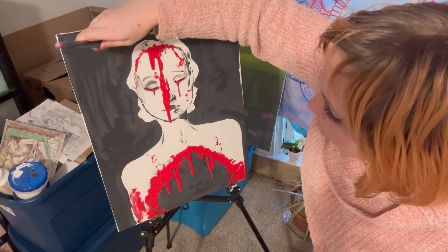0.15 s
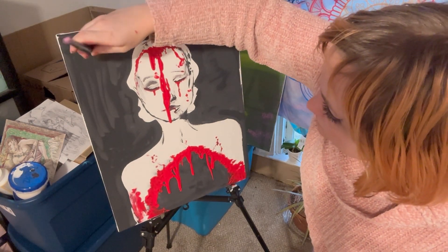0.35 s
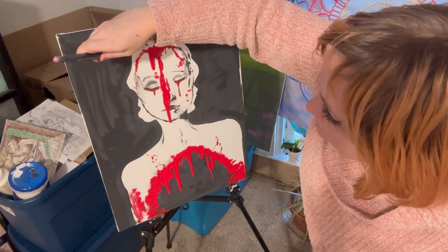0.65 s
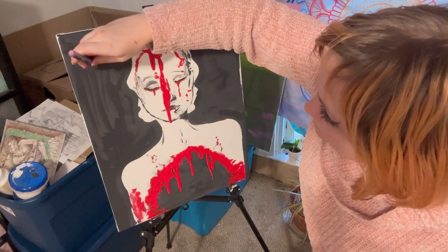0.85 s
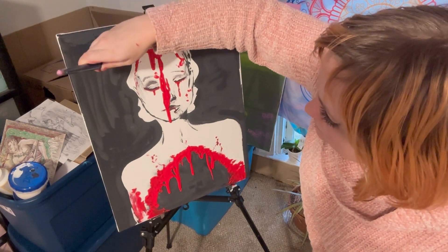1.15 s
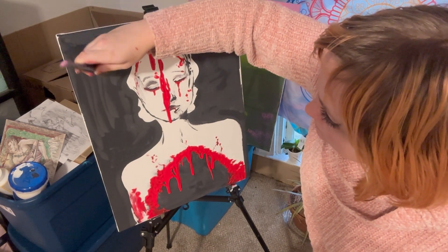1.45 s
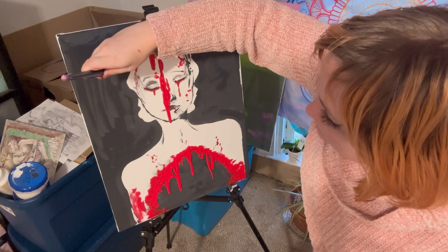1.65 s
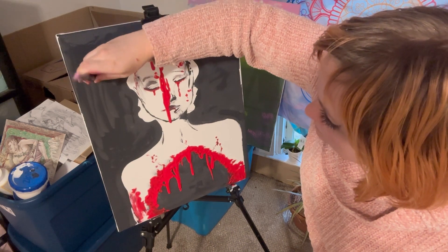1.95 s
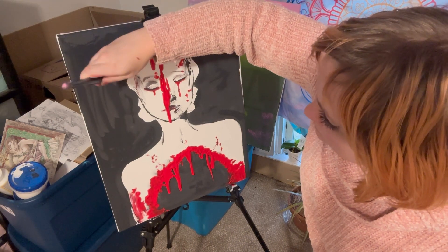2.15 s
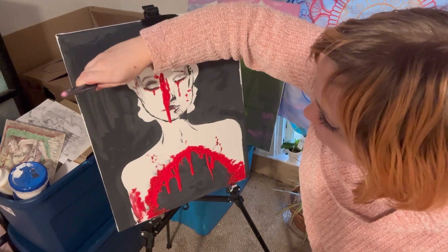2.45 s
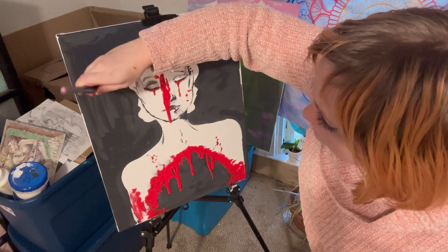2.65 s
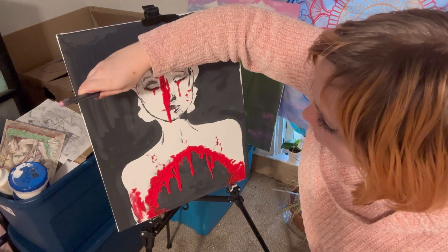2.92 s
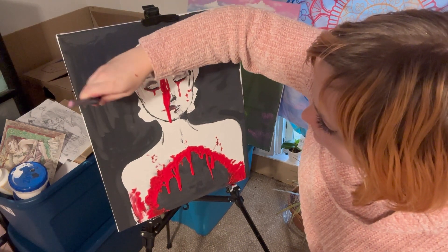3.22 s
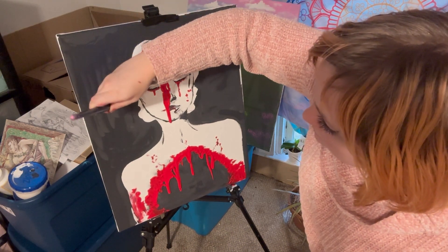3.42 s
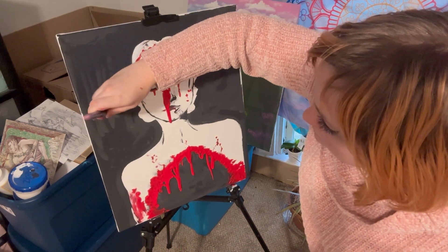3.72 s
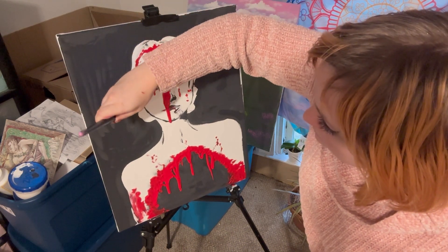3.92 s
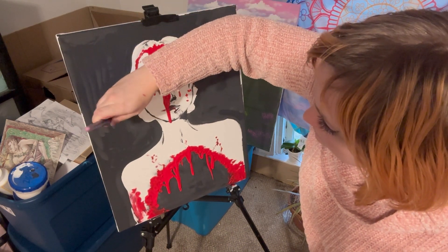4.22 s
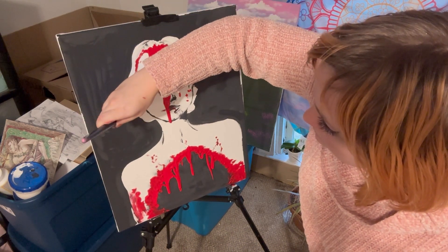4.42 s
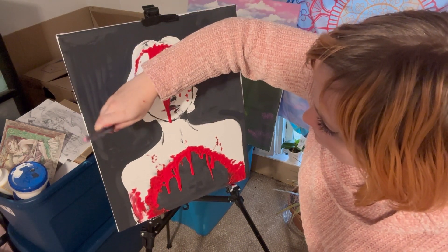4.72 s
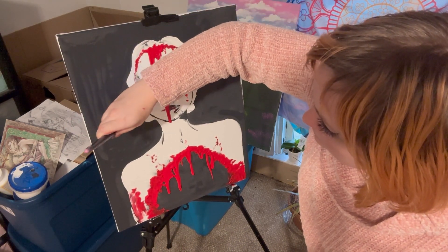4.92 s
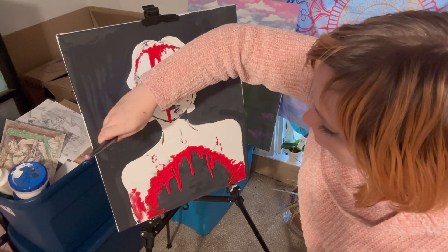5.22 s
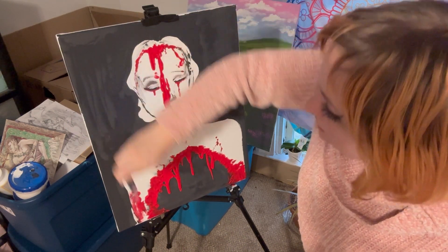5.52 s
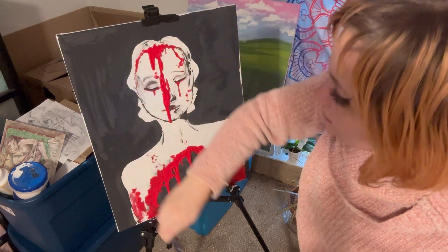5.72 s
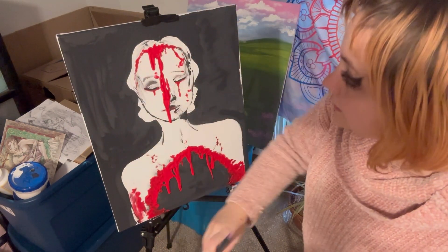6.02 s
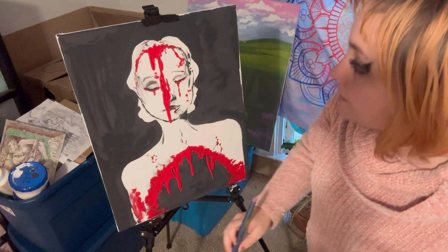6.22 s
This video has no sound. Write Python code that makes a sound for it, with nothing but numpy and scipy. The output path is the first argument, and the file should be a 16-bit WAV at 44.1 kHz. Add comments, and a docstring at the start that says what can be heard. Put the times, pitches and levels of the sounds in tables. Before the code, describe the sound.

A paintbrush makes eleven short, hissing, scraping strokes on a taut canvas in a small room, over low hum and a distant engine drone.

```python
"""In a small room, over mains hum and a distant engine that pulls, a paintbrush starts across a canvas.
Eleven short strokes follow: slips of the bristles hiss and scrape on the weave and the canvas answers.
The engine eases off early and runs on, sinking to a throbbing idle; between strokes the brush ticks,
squeaks and drags, and hand and sleeve rub. At last the arm drops: the sleeve rustles, the hand bumps softly.
Friction is coloured noise shaped by the speed of the hand; engine, hum, squeaks and bumps are sines."""
import sys
import numpy as np
from scipy import signal
from scipy.fft import rfft, irfft, next_fast_len
from scipy.io import wavfile

SR = 44100
rng = np.random.default_rng(int(sys.argv[2]) if len(sys.argv) > 2 else 0)


def materialize(psi):
    """Save the field psi as 16-bit PCM at rate SR to the path in sys.argv[1].

    A 1-D psi becomes a single channel; in a 2-D psi each row is a channel.
    """
    bounded = np.clip(np.atleast_2d(psi).T, -1, 1)
    quanta = np.round(bounded * 32767).astype(np.int16)
    wavfile.write(sys.argv[1], SR, quanta)


N = 280917
TIME = np.arange(N) / SR

# Brush strokes. Each row: time of full speed in seconds, rise in seconds, fall in seconds,
# tips in dB, scrape in dB, canvas in dB, drum in dB, rasp in Hz, rasp in dB, sibilance in Hz,
# sibilance in dB (the tips before their common lift).
STROKES = [(0.233, 0.051, 0.051, -70.5, -67.5, -70, -65.5, 5100, -67.5, 7400, -71),
           (0.779, 0.048, 0.05, -74.5, -69, -79.5, -72.5, 2140, -79.5, 7400, -79.5),
           (1.336, 0.05, 0.041, -72, -69.5, -75.5, -70, 4100, -84, 7400, -76),
           (1.93, 0.056, 0.036, -71.5, -69.5, -73, -78, 2150, -80, 7800, -74.5),
           (2.486, 0.052, 0.06, -73, -68.5, -75.5, -88, 4430, -81, 7700, -75.5),
           (3.062, 0.087, 0.04, -74, -70.5, -77, -72, 1710, -77, 7800, -78),
           (3.6, 0.033, 0.063, -72, -69, -73.5, -74, 4400, -79, 7950, -77),
           (4.066, 0.039, 0.058, -71, -70, -74, -75, 4370, -75, 6750, -81),
           (4.55, 0.057, 0.047, -74, -72.5, -80, -76.5, 4400, -82, 6600, -80),
           (4.97, 0.05, 0.051, -75, -73, -80, -74, 4000, -79, 6100, -81),
           (5.328, 0.037, 0.048, -75, -71.5, -79.5, -75, 2080, -86, 7860, -76)]


def from_db(db):
    """Decibels to gain."""
    return 10 ** (np.asarray(db) / 20)


def rms_one(x):
    """Scale to unit rms."""
    return x / np.sqrt(np.mean(x ** 2) + 1e-20)


def in_time(rows):
    """One curve per column after the time, with a value for every sample."""
    s, *columns = np.transpose(rows)
    return [np.interp(TIME, s, column) for column in columns]


def coloured(x, spectrum):
    """Give a steady excitation a spectrum that dies away above its last point; rms 1."""
    hz, db = np.transpose([*spectrum, (SR / 2, -100)])
    size = next_fast_len(N)
    bins_hz = np.maximum(np.fft.rfftfreq(size, 1 / SR), 1)
    gain = from_db(np.interp(np.log(bins_hz), np.log(hz), db))
    return rms_one(irfft(rfft(x, size) * gain, size)[..., :N])


def drift(rate):
    """Smooth random wandering with spread 1, through a new value `rate` times a second."""
    knots = rng.standard_normal(2048)
    return rms_one(np.interp(TIME * rate, np.arange(len(knots)), knots))


def grains(per_s, spread_db):
    """Random tiny slips of uneven size."""
    chance = rng.random(N) * SR / per_s
    slips = np.flatnonzero(chance < 1)
    out = np.zeros(N)
    size_db = spread_db * np.minimum(-np.log(chance[slips] + 1e-12), 4)
    out[slips] = from_db(size_db)
    return out * rng.uniform(-1.11, 1, N)


def resonant(hz, width_share, slips_per_s=14000):
    """Dense slips through one resonance with steep skirts; rms 1."""
    edges = hz * (1 + width_share) ** np.array([-.5, .5])
    edges = np.minimum(edges, SR / 2 - 1)
    band = signal.butter(1, edges, "band", fs=SR, output="sos")
    return rms_one(signal.sosfilt(np.vstack([band, band]), grains(slips_per_s, 1.6)))


def diffuse(spectrum, side_db):
    """Noise that arrives at the microphones from all around."""
    mid, side = coloured(rng.standard_normal((2, N)), spectrum)
    return mid + from_db(side_db) * side * [[1], [-1]]


def panned(x, right_db):
    """Make the right channel louder than the left."""
    return x * from_db([[-right_db / 2], [right_db / 2]])


def swell(s, rise, fall, onset_shape=1.86, end_shape=2.3):
    """Speed of a sweep of the hand: it gathers gradually and lifts off more quickly."""
    out = np.zeros(N)
    near = np.abs(TIME - s) < 5 * max(rise, fall)
    age = TIME[near] - s
    before = np.abs(age / rise) ** onset_shape
    after = np.abs(age / fall) ** end_shape
    out[near] = np.exp(-np.where(age < 0, before, after))
    return out


def tone(hz):
    """A sine of rms 1 that follows a pitch curve from a random phase."""
    cycles = np.cumsum(hz * np.ones(N)) / SR
    return np.sqrt(2) * np.sin(2 * np.pi * (cycles + rng.random()))


def brush(skim_db=-19, skim_s=0.095, rasp_width=0.38, rasp_lag_s=0.0043, rasp_s=0.033,
          sibilance_width=0.16, tips_lift_db=1.54):
    """Bristles skim, sizzle and scrape, ring at two pitches set by the grip, and the canvas answers."""
    # Spectra of bristle tips, bent bristles, canvas and its drumming.
    # Each row: frequency in Hz, relative level in dB.
    tips, scrape = [(3000, -28), (5500, -19), (6800, 0.5), (7800, 2), (9000, 1.5), (10000, -5),
                    (11000, -22), (14500, -14), (16000, -34)], [(500, -4), (1500, -14), (3000, -3.5), (4100, 1), (5400, -1), (6500, -1.5),
                                  (8000, -22.5), (11000, -23)]
    canvas, drumming = [(300, -9.5), (520, -5), (700, -8.5), (950, -1.5), (1200, -3.5), (1700, -4.5),
                        (2300, -5.5), (3200, -10), (7000, -40)], [(150, -8.5), (330, 5), (520, -0.5), (700, -25.5), (1500, -46)]
    # The bristles trail lightly between strokes. Each row: time in seconds, half length in seconds, level in dB.
    trailing = [(0.1, 0.017, -91), (0.676, 0.07, -88), (1.25, 0.043, -88), (1.635, 0.057, -86),
                (1.837, 0.03, -84.5), (2.26, .04, -86.5), (2.94, 0.037, -83)]
    # Pressure changes within a stroke. Each row: time in seconds, half length in seconds, change in dB.
    presses = [(2.998, 0.016, 1.5), (3.037, .012, -2), (3.649, .01, 3), (4.095, 0.0092, -2),
               (4.116, 0.0085, 4.5), (5.015, .01, 0.5)]
    tips_db, scrape_db, canvas_db, drum_db = np.transpose(STROKES)[3:7]
    sizzle = friction(tips, tips_db + tips_lift_db, lag_s=0.00034, slips_per_s=22000, grain_db=4.0,
                      flutter_db=1.5, spread_db=-22.0, steepness=1.42)
    rub = friction(scrape, scrape_db, lag_s=0.0011, slips_per_s=16000, grain_db=3.0,
                   flutter_db=0.74, spread_db=0.5, steepness=0.96)
    body = friction(canvas, canvas_db, lag_s=0.0013, slips_per_s=4000, grain_db=3.0,
                    flutter_db=3.0, spread_db=-3.0, steepness=1.0)
    drum = friction(drumming, drum_db, lag_s=-0.003, slips_per_s=3000, grain_db=1.5,
                    flutter_db=3.0, spread_db=1.0, steepness=0.82)
    skim, rasp, sibilance = np.zeros((3, N))
    for s, rise, fall, stroke_tips_db, _, _, _, rasp_hz, rasp_db, sibilance_hz, sibilance_db in STROKES:
        # a light touch leads into each stroke
        skim += from_db(stroke_tips_db + skim_db) * swell(s - rise, skim_s, rise)
        rasp += from_db(rasp_db) * swell(s + rasp_lag_s, rasp_s, fall) * resonant(rasp_hz, rasp_width)
        hiss = resonant(sibilance_hz, sibilance_width)
        sibilance += from_db(sibilance_db) * swell(s, rise, fall) * hiss
    skim *= coloured(grains(5100, 3.4), scrape)
    trails = sum(from_db(db) * swell(s, half, half) for s, half, db in trailing)
    trails = trails * coloured(grains(1200, 2.3), canvas)
    pressure = from_db(sum(db * swell(s, half, half) for s, half, db in presses))
    to_the_right = panned(rub + body + drum + skim + rasp + trails, right_db=2.0)
    return pressure * (sizzle + sibilance + to_the_right)


def friction(spectrum, levels_db, lag_s, slips_per_s, grain_db, flutter_db, spread_db, steepness):
    """Dense slips of bristles over the weave, growing with a power of the stroke's speed."""
    force = np.zeros(N)
    for (s, rise, fall, *_), db in zip(STROKES, levels_db):
        force += from_db(db) * swell(s + lag_s, rise, fall) ** steepness
    slips = coloured(grains(slips_per_s, grain_db), spectrum)
    # each microphone gets a share of its own: the same slips shifted far in time
    apart = np.array([np.roll(slips, N // 3), np.roll(slips, -N // 3)])
    texture = rms_one(slips + from_db(spread_db) * apart)
    return force * from_db(flutter_db * drift(70)) * texture


def near_hand(x, path_s=.0028, shift_s=0.000558, echo_db=-6.5):
    """Two echoes off hand and arm comb the sound, their delays wandering slowly."""
    out = x.copy()
    for share in (.5, 1):
        delay = share * (path_s + shift_s * drift(2))
        echo = np.array([np.interp(TIME - delay, TIME, side) for side in x])
        out += from_db(echo_db) * echo
    return out / np.sqrt(1 + 2 * from_db(echo_db) ** 2)


def ticks(attack_s=0.0039, treble_hz=2500, level_db=2.5):
    """Each touch is a short crunch of bristles, coloured by canvas and frame."""
    # Light ticks. Each row: start in seconds, level in dB before level_db, treble tilt in dB, decay in seconds.
    touches = [(0.057, -65, -5, 0.013), (0.577, -69.5, -17, 0.02), (1.641, -71.5, -15, 0.023),
               (2.189, -67, -7, 0.0054), (2.269, -72, 0, 0.013), (2.717, -59.5, -6.5, 0.02),
               (2.727, -63, -11, 0.018), (2.731, -71, -14, 0.01), (2.772, -63.5, -18, 0.0097),
               (3.899, -69, 0, 0.014), (3.912, -58.5, -7, 0.0061), (4.395, -81, 14, 0.011),
               (4.828, -68.5, -14, 0.01), (5.061, -67, 0, 0.0058), (5.232, -69.5, -3, 0.011),
               (5.256, -86.5, 20.5, 0.028), (6.312, -67, -13, 0.013)]
    # Spectrum of the crunch. Each row: frequency in Hz, relative level in dB.
    tick_spectrum = [(150, -8), (350, 8), (550, -1), (770, -1), (1050, -7.5), (1600, -3), (2150, -9),
                     (2700, -13), (3300, -9), (4400, -8.5), (8000, -20.5), (11000, -34)]
    # fainter touches come at random; their level too is before level_db
    grazes_per_s, graze_db, graze_spread_db = 2.2, -86, 6
    graze_tilt_db, graze_decay_s = -10, 0.025
    crunch = coloured(grains(7000, 1.0), tick_spectrum)
    lowpass = signal.butter(1, treble_hz, fs=SR, output="sos")
    dull = signal.sosfilt(lowpass, crunch)
    chances = rng.random((64, 2))
    graze_times = np.cumsum(.5 + chances[:, 0]) / grazes_per_s
    graze_levels_db = graze_db + graze_spread_db * (2 * chances[:, 1] - 1)
    grazes = [(s, db, graze_tilt_db, graze_decay_s)
              for s, db in zip(graze_times, graze_levels_db) if s < TIME[-1]]
    out = np.zeros(N)
    for s, db, tilt_db, decay_s in [*touches, *grazes]:
        span = slice(int(s * SR) + 1, int(s * SR) + SR // 4)
        age = TIME[span] - s
        touch = from_db(db + level_db) * (1 - np.exp(-age / attack_s)) * np.exp(-age / decay_s)
        treble = crunch[span] - dull[span]
        out[span] += touch * (dull[span] + from_db(tilt_db) * treble)
    return out


def squeaks(build_s=0.0026):
    """The brush catches and slips: each slip builds up and dies away within a few cycles of one note."""
    # Tiny squeaks. Each row: start in seconds, pitch in Hz, peak level in dB.
    slips = [(.297, 800, -76), (2.511, 780, -64.5), (2.523, 820, -66), (3.796, 920, -73), (3.829, 965, -72),
             (3.83, 1250, -80), (3.864, 930, -73), (3.882, 960, -73), (3.898, 970, -68), (3.912, 900, -62),
             (3.952, 860, -69), (3.972, 875, -71), (4.054, 830, -66), (4.587, 960, -77), (5.063, 1950, -73)]
    out = np.zeros(N)
    for s, hz, db in slips:
        span = slice(int(s * SR) + 1, int(s * SR) + SR // 10)
        age = TIME[span] - s
        shape = (age / build_s * np.exp(1 - age / build_s)) ** 2
        out[span] += from_db(db) * shape * np.sin(2 * np.pi * hz * age)
    return out


def drags(slips_per_s=400):
    """The brush judders on the canvas: stick and slip excites one resonance near 900 Hz."""
    # Judders. Each row: time in seconds, half length in seconds, level in dB.
    judders = [(3.918, 0.056, -84), (4.523, 0.08, -82.5), (5.36, 0.027, -72.5)]
    # Spectrum of the judder. Each row: frequency in Hz, relative level in dB.
    judder_spectrum = [(400, -8), (700, 1), (860, 24.5), (1050, 16), (1350, -14), (3000, -24), (8000, -52)]
    force = sum(from_db(db) * swell(s, half, half) for s, half, db in judders)
    return force * coloured(grains(slips_per_s, 0.99), judder_spectrum)


def bumps(contact_s=0.0034, uneven_db=0.5):
    """The lowered hand bumps something hollow: a soft contact sets a few low modes ringing briefly."""
    # Soft contacts. Each row: start in seconds, level in dB.
    contacts = [(6.311, -61), (6.334, -55.5), (6.345, -57)]
    # Ringing of the hollow thing. Each row: frequency in Hz, level in dB against the contact, t60 in seconds.
    modes = [(152, 9.5, 0.071), (327.4, 0, 0.064), (376, 2.5, 0.14), (480, -9.5, .08), (630, -15, 0.055),
             (828, -11, 0.11), (890, -17, 0.073)]
    out = np.zeros(N)
    for s, db in contacts:
        span = slice(int(s * SR) + 1, N)
        age = TIME[span] - s
        onset = 1 - np.exp(-age / contact_s)
        for hz, mode_db, t60 in modes:
            ring_db = db + mode_db + uneven_db * rng.standard_normal() - 60 * age / t60
            out[span] += onset * from_db(ring_db) * np.sin(2 * np.pi * (hz * age + rng.random()))
    return out


def shifts(width_share=0.47):
    """Each shift of hand and arm is a soft, low rub with a pitch of its own."""
    # Dull rubs. Each row: time in seconds, half length in seconds, pitch in Hz, level in dB.
    rubs = [(0.239, .03, 550, -77), (.68, .08, 304, -73), (1.257, 0.033, 210, -62),
            (1.852, 0.14, 211, -70.5), (2.062, 0.018, 315, -71.5), (2.45, 0.027, 235, -66),
            (2.627, 0.057, 302, -73), (2.843, 0.05, 390, -81.5), (3.058, .04, 203, -63),
            (3.275, 0.064, 220, -64), (3.934, 0.034, 474, -79), (3.934, 0.042, 228, -68.5),
            (4.085, 0.064, 292, -71), (4.255, 0.032, 372, -73), (4.46, .05, 222, -70),
            (4.86, 0.05, 466.6, -81), (5.231, 0.012, 474, -69.5), (5.362, 0.035, 460, -75.5),
            (5.85, 0.024, 447, -74.5), (6.12, 0.05, 306, -72)]
    return sum(from_db(db) * swell(s, half, half) * resonant(hz, width_share) for s, half, hz, db in rubs)


def sleeve(stir_db=-81.0, stir_spread_db=5.0, swish_width=0.17):
    """Knitted cloth rubs dully, with a narrow swish and a fibre hiss; the arm is never quite still."""
    # Sleeve movements. Each row: time in seconds, half length in seconds, level in dB,
    # hiss of the fibres in dB against it, swish in Hz, swish in dB against the level.
    movements = [(2.453, 0.048, -69.5, -17, 1100, -29), (5.097, 0.035, -73.5, -16, 1880, -19),
                 (5.23, 0.025, -71, -25, 1050, -17), (5.605, 0.048, -74.5, -20, 1590, -17.5),
                 (5.688, 0.063, -69.5, -24, 1086, -24), (5.861, 0.056, -82, -12, 1580, -7.5),
                 (5.955, 0.061, -77, -22, 1080, -25), (6.347, 0.041, -60.5, -12, 940, -17.5)]
    # Spectra of cloth, fibres and small stirrings. Each row: frequency in Hz, relative level in dB.
    cloth, fibres, stirring = [(100, -17), (200, 8.5), (380, 11.5), (600, -1), (800, -16.5), (1100, -7.5),
                               (1350, -27), (1650, -14), (2500, -42), (8000, -58)], [(1000, 1), (3000, -7.5), (8500, -7), (11000, -19),
                                              (15000, -35)], [(100, -8), (230, 0), (340, -4.5), (450, -6.5),
                                                              (700, -18), (2000, -34)]
    rub, hiss, swish = np.zeros((3, N))
    for s, half, db, hiss_db, swish_hz, swish_db in movements:
        speed = swell(s, half, half)
        rub += from_db(db) * speed
        hiss += from_db(db + hiss_db) * speed
        swish += from_db(db + swish_db) * speed * resonant(swish_hz, swish_width)
    stir_level = from_db(stir_db + stir_spread_db * np.tanh(drift(14)))
    stir = stir_level * diffuse(stirring, side_db=1.0)
    flutter = from_db(1.4 * drift(50))
    rustle = swish + rub * diffuse(cloth, side_db=-3.5) + hiss * diffuse(fibres, side_db=1.0)
    return stir + flutter * rustle


def engine():
    """A distant engine, only its low orders coming through the walls: it pulls, eases off and runs on."""
    return engine_pulling() + engine_running_on() + second_low_tone()


def engine_pulling(overtone_db=-11.0):
    """The drone and higher orders of the engine cycle; the overtones go first as it eases off."""
    # The pull. Each row: time in seconds, drone in Hz, drone in dB.
    pull = [(0.0, 55.95, -46), (0.49, 58.22, -43.5), (0.93, 59.76, -46), (1.1, 57.73, -46),
            (1.252, 54.3, -48), (1.408, 51.1, -55), (1.6, 44.2, -54)]
    # Overtones. Each row: order of the engine cycle (the drone is order five), level in dB before overtone_db.
    orders = [(6, -26), (7, -15), (8, -9.5), (9, -8), (10, -4.5), (11, -4), (13, -13), (15, -11), (16, -1),
              (18, -26.5), (19, -25.5)]
    # Room mode that picks out an overtone. The row: frequency in Hz, width in Hz, level in dB before overtone_db.
    mode_hz, mode_width_hz, mode_db = (227, 3.6, -9)
    hz, drone_db = in_time(pull)
    upper = sum(from_db(db + .7 * drift(5)) * tone(hz * order / 5) for order, db in orders)
    # the fourth harmonic sounds only while it passes through the room mode
    detuning = (4 * hz - mode_hz) / mode_width_hz
    upper += from_db(mode_db) * tone(4 * hz) / (1 + detuning ** 2)
    upper *= np.interp(TIME, [1.3, 1.45], [1, 0])
    pulling = from_db(drone_db) * (tone(hz) + from_db(overtone_db) * upper)
    return panned(pulling * np.interp(TIME, [1.4, 1.7], [1, 0]), right_db=2.0)


def engine_running_on(waver_db=3.0, twelfth_db=-13, wobble=0.00946):
    """Drone, octave and twelfth waver and sink to idle, where the octave throbs."""
    # Running on. Each row: time in seconds, drone in Hz, drone in dB, its octave in dB.
    cruise = [(1.5, 74.1, -57.5, -66), (1.88, 66.1, -58, -70.5), (2.86, 66.47, -59, -71),
              (3.3, 61.19, -53, -63), (3.42, 59.7, -60, -57), (3.58, 57.6, -54.5, -57.5),
              (3.7, 56.3, -58.5, -72), (3.9, 54.35, -55.5, -66.5), (4.45, 56.3, -56, -58),
              (4.7, 56.1, -57.5, -64), (5.0, 55.5, -56, -68), (5.2, 55.22, -59, -61.5),
              (5.9, 55.19, -62, -59), (6.37, 54.56, -60.5, -55.5)]
    throb_hz, throb_crest_s, throb_from_s, throb_depth = 6.85, 5.7, 4.95, .55
    hz, drone_db, octave_db = in_time(cruise)
    throb_in = np.interp(TIME, [throb_from_s, throb_from_s + 0.12], [0, 1])
    throb = 1 + throb_depth * throb_in * np.cos(2 * np.pi * throb_hz * (TIME - throb_crest_s))
    gains = [from_db(drone_db), from_db(octave_db) * throb, from_db(octave_db + twelfth_db)]
    hz = hz * (1 + wobble * drift(5.4))
    running = sum(gain * from_db(waver_db * drift(7)) * tone(hz * harmonic)
                  for harmonic, gain in enumerate(gains, 1))
    return running * np.interp(TIME, [1.25, 1.5], [0, 1])


def second_low_tone(hz=77.04, peak_s=4.0, width_s=.25, peak_db=-54):
    """A second low tone swells once against the drone."""
    return from_db(peak_db) * tone(hz) / np.hypot(1, (TIME - peak_s) / width_s)


def outdoor_rumble(rest_db=-60):
    """Low diffuse noise from outside wavers and swells now and then."""
    # Surges. Each row: time in seconds, half length in seconds, rise in dB.
    surges = [(0.71, 0.84, 3), (3.247, 0.24, 2.5), (4.202, 0.5, 2.5)]
    # Spectrum of the rumble. Each row: frequency in Hz, relative level in dB.
    rumble_spectrum = [(15, -21.5), (25, -1.5), (34, 1.5), (45, 9.5), (80, 7), (130, 3), (175, -3.5),
                       (220, -5.5), (255, -22), (320, -19.5), (450, -30.5), (700, -41), (2000, -58.5)]
    level_db = rest_db + sum(db * swell(s, half, half) for s, half, db in surges)
    return from_db(level_db + 2.0 * drift(12)) * diffuse(rumble_spectrum, side_db=-8.0)


def mains_hum(waver_db=2.0):
    """Mains hum and faint appliance tones, wavering in level and pitch."""
    # Steady tones. Each row: frequency in Hz, level in dB.
    tones = [(60, -69), (120, -64), (302, -83.5), (354, -88.5), (444, -91), (765, -104.5)]
    return sum(from_db(db + waver_db * drift(10.0)) * tone(hz * (1 + .004 * drift(9))) for hz, db in tones)


def room_air(air_db=-77.0):
    """The still air of the room: steady diffuse noise."""
    # Spectrum of the air. Each row: frequency in Hz, relative level in dB.
    air_spectrum = [(100, 22.5), (400, 8.5), (700, 5.5), (1200, 0.1), (2500, -3), (5000, -7), (9500, -10.5),
                    (11000, -15.5), (13000, -21.5), (15000, -33)]
    return panned(from_db(air_db) * diffuse(air_spectrum, side_db=-0.5), right_db=0.7)


def background():
    """Engine, outdoor rumble, hum and air together."""
    return engine() + outdoor_rumble() + mains_hum() + room_air()


def room(x, t60=0.15, wet_db=-11, wall_hz=6000):
    """Direct sound at two spaced microphones, a few reflections and a short, duller tail."""
    # Early reflections from easel and walls. Each row: delay in seconds, level in dB.
    reflections = [(.0031, -35.5), (.0063, -16.5), (.0094, -11)]
    right_lag_s = .000094  # the canvas is nearer to the left microphone
    age = TIME[:SR // 4]
    tail = rng.standard_normal((2, len(age))) * from_db(-60 * age / t60) * (age > .004)
    response = from_db(wet_db) * tail / np.sqrt(np.sum(tail ** 2, axis=1, keepdims=True))
    for s, db in reflections:
        arrivals_s = s + rng.uniform(0, .0003, 2)
        response[[0, 1], np.round(arrivals_s * SR).astype(int)] += from_db(db)
    response = signal.sosfilt(signal.butter(1, wall_hz, fs=SR, output="sos"), response)
    # direct sound, with a delay of a fraction of samples on the right
    response[0, 0] += 1
    response[1] += np.sinc((age - right_lag_s) * SR)
    return signal.fftconvolve(x, response, axes=1)[:, :N]


def scene():
    """Brush and touches in the room, the sleeve, and the background behind them."""
    touches = ticks() + squeaks() + drags() + bumps() + shifts()
    at_the_canvas = near_hand(brush()) + panned(touches, right_db=3.0)
    return room(at_the_canvas) + panned(sleeve(), right_db=3.5) + background()


def record(dry):
    """The sound eases in over 5 ms and the top is cut, 60 dB down from 16 kHz."""
    eased = dry * np.minimum(TIME / .005, 1)
    lowpass = signal.cheby2(12, 60, 16000, fs=SR, output="sos")
    return signal.sosfilt(lowpass, eased)


dry = scene()
out = record(dry)
materialize(out)
```